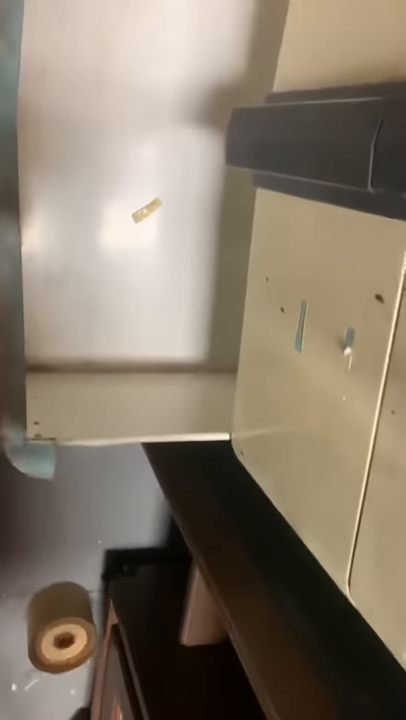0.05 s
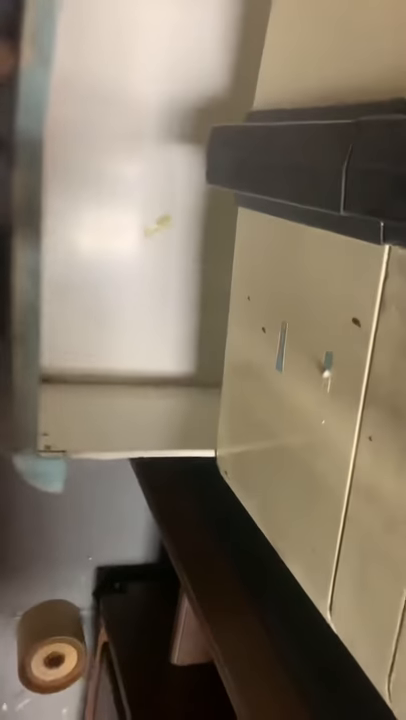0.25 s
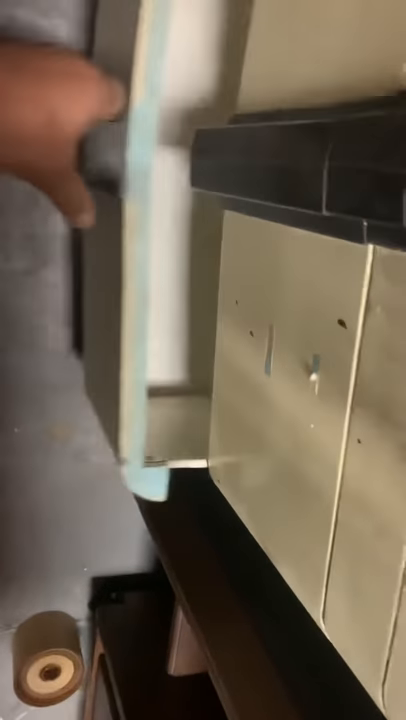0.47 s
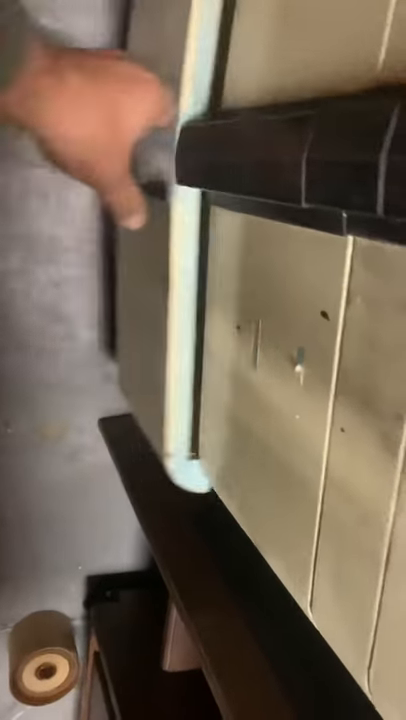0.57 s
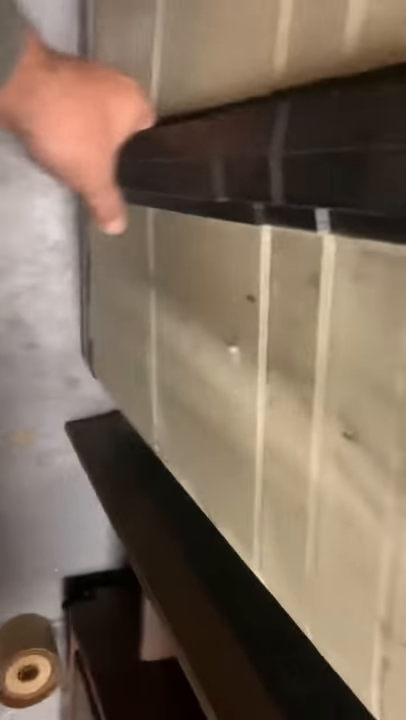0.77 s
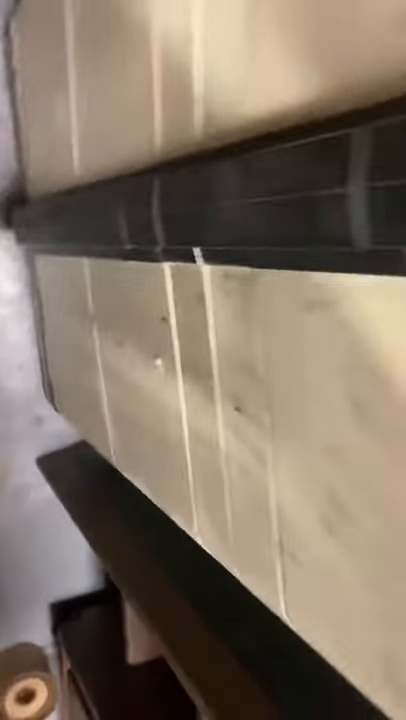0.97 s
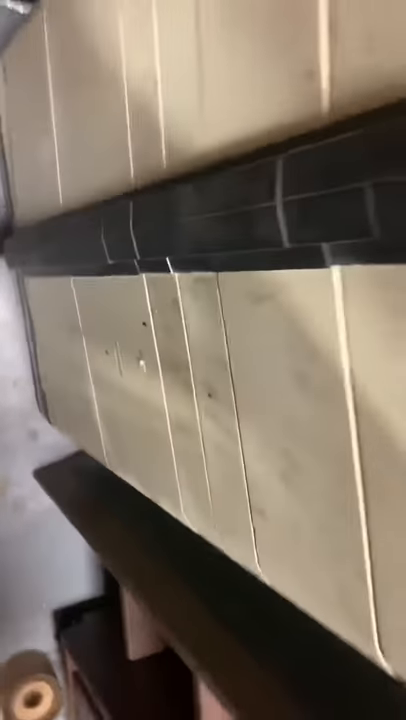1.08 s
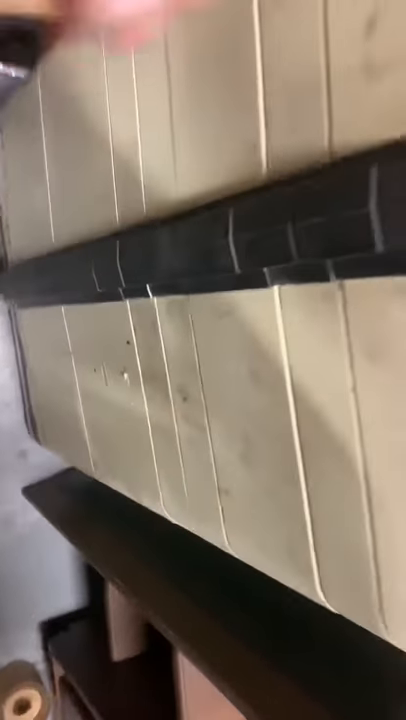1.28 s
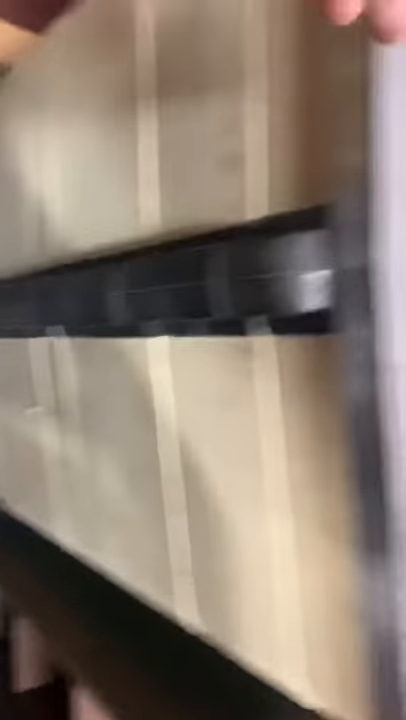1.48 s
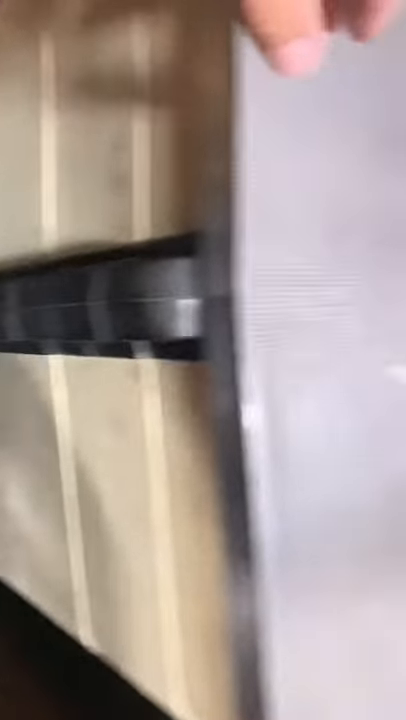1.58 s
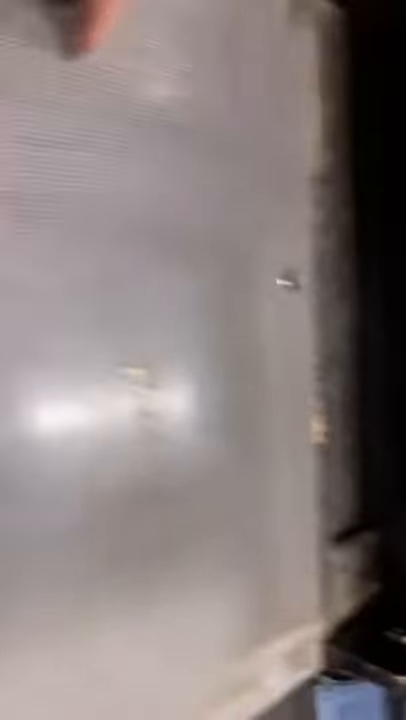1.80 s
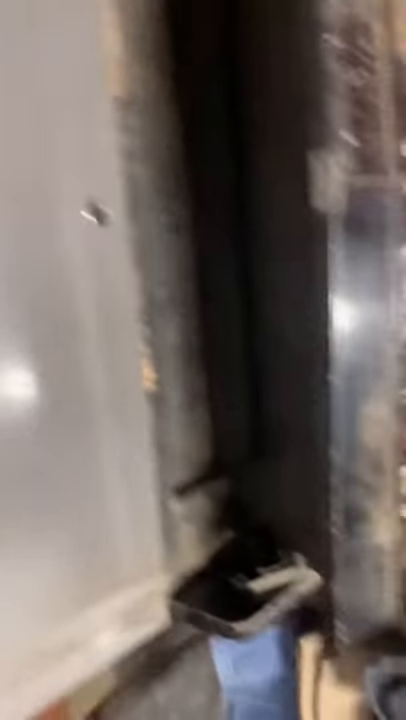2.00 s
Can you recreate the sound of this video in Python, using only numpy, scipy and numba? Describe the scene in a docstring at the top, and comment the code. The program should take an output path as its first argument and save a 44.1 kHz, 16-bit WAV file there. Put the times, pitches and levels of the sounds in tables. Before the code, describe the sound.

Close to the microphone in a quiet room, a metal cabinet drawer rolls in, scraping and rattling, and bangs shut. As the cabinet's boom fades, a latch clicks and a second drawer slides gently open.

```python
"""A steel filing drawer is pushed shut in a quiet room. Its wheels rumble and hiss, panels sing, and the
cabinet air hums, lower the further in the drawer is. A wheel chirps; the drawer clacks and scrapes
along its rails. At 0.6 s its front slams on the frame and chatters, and the cabinet booms.
At 1.4 s the next drawer is unlatched, knocks and rolls softly out.
Close by, a phone with two ports and gain control listens."""
import sys
import numpy as np
from scipy import signal
from scipy.fft import rfft, irfft
from scipy.io import wavfile
from scipy.ndimage import uniform_filter1d
from numba import njit

SR = 44100
rng = np.random.default_rng(int(sys.argv[2]) if len(sys.argv) > 2 else 0)


def master(y):
    """Save y as 16-bit WAV."""
    cut = np.clip(np.atleast_2d(y).T, -1, 1)
    pcm = np.round(cut * 32767)  # scale
    wavfile.write(sys.argv[1], SR, pcm.astype(np.int16))


N = 90404
T = np.arange(N) / SR
HZ = np.maximum(np.fft.rfftfreq(N, 1 / SR), 1)
STEEL_T60_S = 0.11


def amp(db):
    """Decibels to gain."""
    return 10 ** (np.asarray(db) / 20)


def curve(table, column):
    """Table column interpolated over time."""
    rows = np.array(table)
    return np.interp(T, rows[:, 0], rows[:, column])


def spectrum(table):
    """Table interpolated over log frequency."""
    rows = np.array(table)
    return np.interp(np.log(HZ), np.log(rows[:, 0]), rows[:, 1])


def pan(db):
    """Port gains for a left-minus-right level."""
    return amp(db * np.array([[.5], [-.5]]))


def noise(gain=1., wide_hz=1720):
    """Two-port noise, rms 1: alike in the bass, unrelated above wide_hz."""
    mid, side = rfft(rng.standard_normal((2, N)))
    width = np.minimum(HZ / wide_hz, 1)
    ports = mid + width * side * np.array([[1], [-1]])
    x = irfft(gain * ports / np.sqrt(1 + width ** 2), N)
    return x / x.std()


def walk(rate_hz):
    """Smooth random drift, spread near 1."""
    hold = int(SR / rate_hz)
    steps = rng.standard_normal(N // 20)[np.arange(N) // hold]
    return 1.015 * uniform_filter1d(steps, hold)


def fade(t60_s):
    """Exponential decay."""
    return np.exp(-np.log(1000) * T / max(t60_s, 1e-3))


def rise(tau_s):
    """Exponential onset."""
    return 1 - np.exp(-T / tau_s)


def convolve(x, response):
    """Pass a sound through a response."""
    return signal.fftconvolve(np.atleast_2d(x), np.atleast_2d(response), axes=1)[:, :N]


def strike(hits, response):
    """Play a response at each hit (t/s, level/dB)."""
    impulses = np.zeros(N)
    for t_s, db in hits:
        impulses[int(t_s * SR)] += amp(db)
    return convolve(impulses, response)


def ring(modes, lead_s=0):
    """Sum of decaying modes (f/Hz, level/dB, t60/s)."""
    return sum(amp(db) * fade(t60_s) * np.sin(2 * np.pi * hz * (T + lead_s)) for hz, db, t60_s in modes)


def sheet(colour, ripple_db=3, spacing_hz=45.3):
    """Gain of thin steel sheet: overall colour plus crowded narrow resonances."""
    peaks = np.interp(HZ / spacing_hz, np.arange(N // 20), rng.standard_normal(N // 20))
    return amp(spectrum(colour) + ripple_db * peaks * np.minimum(HZ / 3000, 1))


def causal(gain):
    """Minimum-phase response of this shape, unit power."""
    cepstrum = irfft(np.log(gain), N)
    response = np.exp(rfft(2 * cepstrum[:N // 2], N) - cepstrum[0])
    return response / np.sqrt(np.mean(abs(response) ** 2))


def clatter(hits, colour, t60_s, crack_db, crack_t60_s):
    """Per contact: a short crack, then dense sheet modes dying away."""
    envelope = strike(hits, fade(t60_s) + amp(crack_db) * fade(crack_t60_s))
    return irfft(rfft(noise() * envelope) * causal(sheet(colour)), N)


def background():
    """Steady low noise of the quiet room."""
    colour = [(20, 5), (50, 5), (100, 2), (200, -18.5), (1200, -20.5), (2500, -30.5), (4000, -31),
              (8000, -41.5), (16000, -73)]  # f/Hz, level/dB
    return amp(-46.5) * noise(amp(spectrum(colour)))


def rollers():
    """Gritty wheels shake the drawer and hiss on the rails; once it has slammed, the cabinet settles. After the
    slam, rumble and hiss duck briefly as if by gain control, return, then fade."""
    levels = [(0, -41.5, -104), (.08, -41, -63), (.16, -37, -59.5), (.20, -25, -58), (.24, -29, -55.5),
              (.28, -34.5, -48), (.34, -23.5, -44.5), (.40, -34.5, -54.5), (.47, -20.5, -45),
              (.505, -30, -72), (.55, -20.5, -39), (.595, -23, -41), (.635, -15, -49), (.69, -26, -46.5),
              (.74, -37.5, -89), (.80, -39.5, -62), (.89, -35, -56.5), (1.0, -50.5, -63.5),
              (1.22, -52.5, -64.5), (1.3, -63, -88), (1.38, -61, -67), (1.47, -45, -63), (1.52, -65, -67),
              (1.6, -53, -65.5), (1.8, -57, -76), (1.91, -58.5, -54.5), (1.97, -58.5, -80)]  # t/s, rumble/dB, hiss/dB
    drawer_modes = [(128, 8.1, -5), (205.5, 8.5, 7), (292.4, 2.5, 6.5), (385, 31, 1.5), (691, 21, -2),
                    (1100, 120, -8), (1422, 100, -12.5)]  # f/Hz, width/Hz, level/dB
    rumble_colour = [(30, 1.5), (60, 10), (120, 12.5), (300, 6), (600, -8), (1200, -21.5), (2200, -26),
                     (5000, -76), (16000, -71)]  # f/Hz, level/dB
    hiss_colour = [(100, -15.5), (700, 11.5), (2500, -4), (4500, 7), (6700, 3), (9000, -5), (13300, 0),
                   (15500, -14.5)]  # f/Hz, level/dB
    body = sum(amp(db) / (1 + 1j * (HZ ** 2 - hz ** 2) / (HZ * width_hz))
               for hz, width_hz, db in drawer_modes)
    rumble = noise(np.hypot(abs(body), amp(spectrum(rumble_colour))))
    rumble *= amp(curve(levels, 1) + 2.6 * walk(60.02))
    hiss = noise(sheet(hiss_colour)) * amp(curve(levels, 2) + 1.6 * walk(440))
    return rumble + hiss


def singing(rise_s=0.015):
    """Wheels excite single panel modes, which swell, waver and die."""
    tones = [(.21, .36, 303, -21.5), (.18, .12, 712, -33), (.18, .14, 1165, -38), (.172, .13, 1405, -42),
             (0, .2, 203, -36)]  # start/s, length/s, f/Hz, level/dB
    out = np.zeros(N)
    for start_s, length_s, hz, db in tones:
        age_s = np.maximum(T - start_s, 0)
        envelope = np.minimum(age_s / rise_s, 1) * np.maximum(1 - age_s / length_s, 0) ** 2
        envelope *= amp(db + 1.5 * walk(65))
        pitch_hz = hz * (1 + 0.0088 * walk(40))
        out += envelope * np.sin(2 * np.pi * np.cumsum(pitch_hz) / SR)
    return out


def cabinet_air():
    """Wheels keep the air cavity humming; pitch follows drawer position."""
    resonance = [(.15, 123.7, -46), (.23, 121, -31.5), (.33, 101.6, -34.5), (.44, 96.6, -25.5),
                 (.53, 87.4, -24.5), (.61, 85.86, -23.5), (.68, 88.04, -27), (1.38, 87.9, -67),
                 (1.46, 91.2, -48), (1.54, 110.8, -43), (1.59, 108.3, -52.5), (1.64, 110.8, -40),
                 (1.93, 113.8, -39.5), (2.05, 116.9, -34)]  # t/s, f/Hz, level/dB
    pitch_hz = curve(resonance, 1) * (1 + 0.011 * walk(30))
    rms = amp(curve(resonance, 2) + 0.44 * walk(29))
    return np.sqrt(2) * rms * np.sin(2 * np.pi * np.cumsum(pitch_hz) / SR)


def squeak():
    """One dry wheel chirps."""
    modes = [(5220, -42, 0.022)]  # f/Hz, level/dB, t60/s
    return strike([(.099, 0)], ring(modes))


def clacks():
    """Wheels clack over stops in the rails."""
    hits = [(.1723, -33), (.328, -45.5), (.4132, -31), (.428, -36), (.4521, -29.5), (.517, -30.5),
            (.5335, -25), (.552, -35.5)]  # t/s, level/dB
    colour = [(60, -27.5), (200, 15.5), (500, 1), (1400, 7.5), (3000, 1.5), (6700, -2), (9000, -10.5),
              (13300, -7.5), (15500, -25)]  # f/Hz, level/dB
    return clatter(hits, colour, t60_s=0.15, crack_db=-5, crack_t60_s=0.034)


def snaps():
    """Wheel and latch edges snap on contact, each with its own brightness."""
    hits = [(0.1727, -28, -3), (0.339, -37, 0), (0.412, -25.5, 10.5), (0.417, -18.5, 6.5),
            (0.455, -26.5, 0.5), (.517, -25.5, 4.5), (.552, -31, 2), (1.3901, -22.5, -2.5),
            (1.424, -37, 0.5)]  # t/s, level/dB, treble tilt/(dB/octave)
    colour = [(100, 2), (500, 6), (1800, 4.5), (4000, -8.5), (15000, -15.5)]  # f/Hz, level/dB
    octaves = np.log2(np.maximum(HZ / 1000, 1))
    out = 0
    for t_s, db, tilt in hits:
        burst = noise() * strike([(t_s, db)], fade(t60_s=0.015))
        out += rfft(burst) * causal(amp(spectrum(colour) + tilt * octaves))
    return irfft(out, N)


def scrape(start_s=.275, length_s=.175, slips_per_s=260):
    """The drawer's side drags on a rail: uneven slips ring the panel, swelling and easing off."""
    panel_modes = [(465, -5.5), (610, -3), (700, 2), (1020, -6)]  # f/Hz, level/dB
    pressure = np.sin(np.pi * np.clip((T - start_s) / length_s, 0, 1))
    slips = (rng.random(N) < slips_per_s / SR) * rng.uniform(-1, 1, N) * np.sqrt(abs(pressure))
    panel = convolve(slips, ring([(hz, db, STEEL_T60_S) for hz, db in panel_modes]))
    return amp(-38) * panel / np.sqrt(np.sum(panel ** 2) / (length_s * SR))


def slam():
    """The steel front clangs on the frame and chatters; each later contact scrapes the same modes."""
    hits = [(.6114, 1), (.6162, -3.5), (.6215, -25.5), (.6272, -2), (.642, -17.5)]  # t/s, level/dB
    front_modes = [(620, 2), (766, -4), (920, -3), (996, 0), (1137, 0), (1205, 4), (1265, -1), (1458, -1),
                   (1525, -8), (1746, -3), (1810, -5), (2010, -6), (2226, -9), (2315, -10), (2864, -16),
                   (3300, -14), (3560, -16), (4280, -18)]  # f/Hz, level/dB
    crash_colour = [(60, -37), (200, -0.5), (700, 4), (1900, 2.5), (2550, -10), (4300, -12.5),
                    (5500, -24.5), (7500, -19.5), (10000, -30), (13300, -28), (15500, -40)]  # f/Hz, level/dB
    modes = [(hz, db, STEEL_T60_S) for hz, db in front_modes]
    front = np.array([ring(modes), ring(modes, lead_s=.00006)])
    clang = strike([(hits[0][0], -12)], front * rise(0.0005))
    scrapes = noise() * strike(hits[1:], fade(0.0095))
    chatter = amp(-8.5) * convolve(scrapes, front / np.sqrt(np.sum(front ** 2) / 2))
    crash = amp(-17) * clatter(hits, crash_colour, t60_s=0.12, crack_db=3, crack_t60_s=0.012)
    return (clang + chatter) * pan(db=1) + crash


def boom():
    """The cabinet's panels and air take up the blow a moment later."""
    modes = [(52.8, -18.5, 1.15), (67.4, 2, 0.16), (89.95, -17, 1.4), (83.4, -27.5, 2.1), (130.4, -11, .16),
             (209, -9.5, 0.11), (233.2, -32, 1.1), (292.6, -34.5, 0.59), (320, -16.5, 0.22)]  # f/Hz, level/dB, t60/s
    return strike([(.6235, 1.5)], ring(modes) * rise(0.0059))


def latch():
    """The next drawer's latch lets go: clicks and a low ring."""
    hits = [(1.3905, -29), (1.3968, -31.5), (1.424, -55)]  # t/s, level/dB
    colour = [(50, -18), (130, 10.5), (220, 15), (400, 5), (650, -10), (1200, -1), (2800, -10),
              (8000, -8.5), (10500, -35), (13300, -14), (15500, -21)]  # f/Hz, level/dB
    modes = [(211.4, -29, .14), (229, -31.5, .14), (545, -30, .05)]  # f/Hz, level/dB, t60/s
    clicks = amp(-5.5) * clatter(hits, colour, t60_s=0.15, crack_db=-1, crack_t60_s=0.0053)
    return clicks + strike([(hits[0][0], 0)], ring(modes) * rise(0.0019))


def knock():
    """The freed drawer knocks softly as it starts to roll."""
    colour = [(60, -8), (200, 8.5), (420, 1.5), (1000, -13), (2000, -25), (16000, -55)]  # f/Hz, level/dB
    return clatter([(1.557, -40.5)], colour, t60_s=0.11, crack_db=-15, crack_t60_s=0.017)


def room(x, t60_1khz_s=0.77, damping=0.15):
    """Diffuse tail in octave bands; treble dies first."""
    air, tail = rfft(noise()), 0
    for hz in 125 * 2 ** np.arange(8):
        band = np.maximum(1 - abs(np.log2(HZ / hz)), 0)
        tail += irfft(air * band, N) * fade(t60_1khz_s * (hz / 1000) ** -damping)
    tail *= rise(0.0062)
    return amp(-19.5) * convolve(x, tail / np.sqrt(np.sum(tail ** 2) / 2))


def scene():
    """Metal sounds with their room, over cabinet bass and background."""
    metal = rollers() + singing() + squeak() + clacks() + snaps() + scrape() + slam() + latch() + knock()
    return metal + room(metal) + cabinet_air() + boom() + background()


@njit
def follow(x, attack_s, release_s):
    """Envelope follower."""
    out, level = np.empty(len(x)), 0.
    for i in range(len(x)):
        level += (x[i] - level) / (SR * (attack_s if x[i] > level else release_s))
        out[i] = level
    return out


def record(dry, threshold_db=-10, ratio=1.7, port_delay_s=9 / SR):
    """Phone: gain ducks after peaks; subtracting the other port's delayed treble widens the image."""
    balance = [(90, -2.5), (220, 1), (550, -2.5), (2300, -2.5), (4500, 0), (12000, 1)]  # f/Hz, left minus right/dB
    crossfeed = [(1000, 0.028), (2500, 0.16), (4500, 0.52), (9000, 1)]  # f/Hz, share of other port subtracted
    low_cut = signal.butter(5, 46, "high", fs=SR, output="sos")
    high_cut = signal.ellip(12, .2, 90, 15600, fs=SR, output="sos")
    lean = signal.sosfilt(low_cut, dry)
    level = follow(abs(lean).max(axis=0), attack_s=0.0038, release_s=.09)
    gain = np.maximum(level / amp(threshold_db), 1) ** (1 / ratio - 1)
    ports = rfft(np.tanh(lean * gain)) * pan(spectrum(balance))
    share = spectrum(crossfeed)
    other = np.exp(-2j * np.pi * HZ * port_delay_s) * ports[::-1]
    wide = irfft((ports - share * other) / np.sqrt(1 + share ** 2), N)
    return signal.sosfilt(high_cut, wide)


dry = scene()
out = record(dry)
master(out)
```